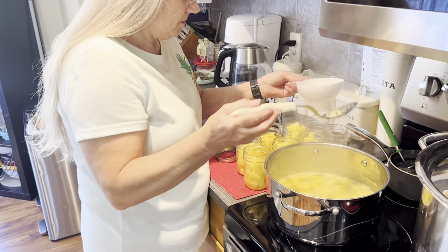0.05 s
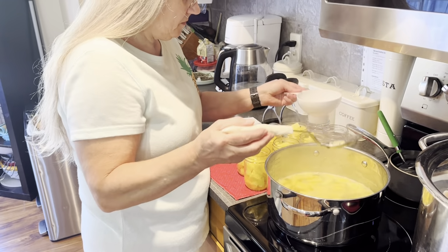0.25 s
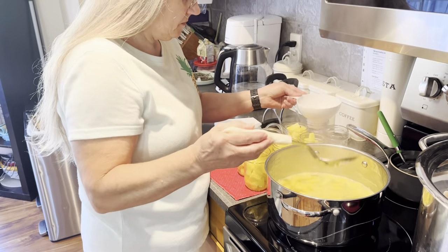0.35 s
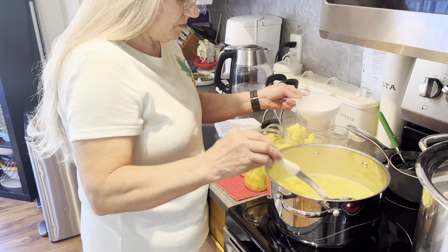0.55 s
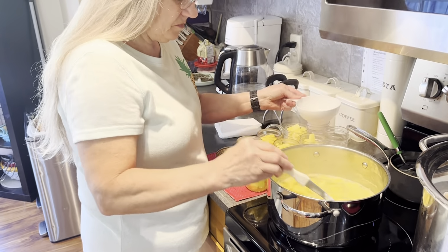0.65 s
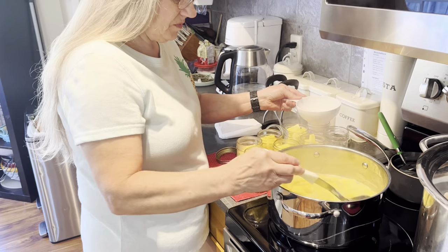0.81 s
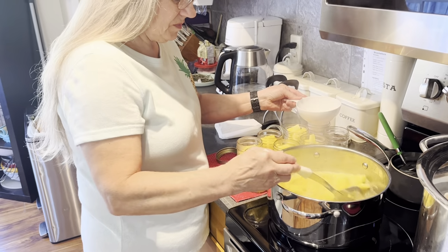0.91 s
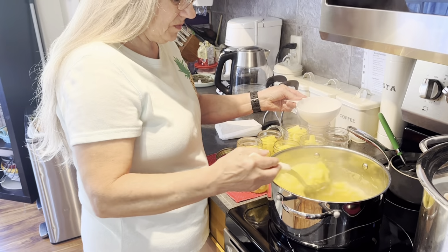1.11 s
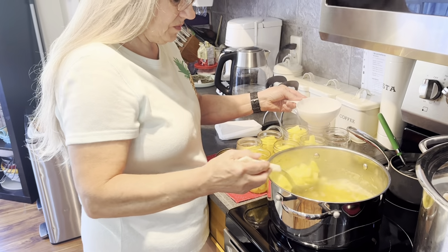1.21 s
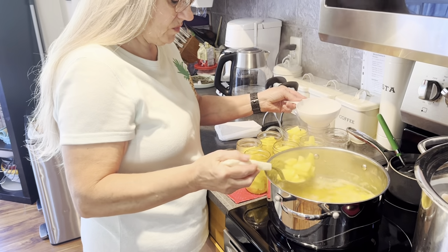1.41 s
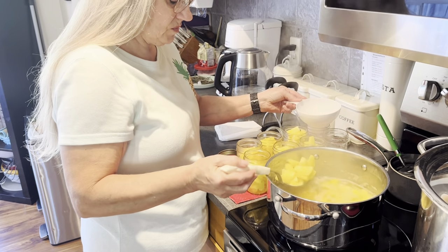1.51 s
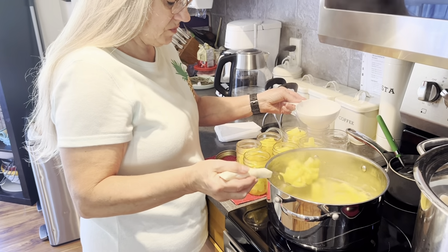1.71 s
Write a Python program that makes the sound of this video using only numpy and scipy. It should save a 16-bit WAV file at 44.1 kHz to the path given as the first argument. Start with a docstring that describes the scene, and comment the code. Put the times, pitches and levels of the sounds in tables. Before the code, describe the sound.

Spoon against a full cooking pot, with dull clinks and a gritty scrape, then a loud rim knock and a soft fruit thud; a funnel raps glass beforehand. Fridge hum, hard-walled kitchen, handheld phone in stereo.

```python
"""A home kitchen: a fridge hums behind, a low room rumble swells and dips, and hard walls give a short bright
tail. A plastic funnel knocks and rattles on a glass jar, a slotted metal spoon taps and scrapes along a full
steel pot and bumps its rim, fruit thuds softly and small wet ticks sound. Rough pushes ring banks of decaying
sines with a crack of noise and loose clatter; the scrape is dense clicks ringing the damped pot. All is heard
in stereo through the two microphone ports of a phone."""
import sys
import numpy as np
from scipy import signal
from scipy.fft import rfft, irfft
from scipy.io import wavfile
from scipy.ndimage import uniform_filter1d

SR = 44100
rng = np.random.default_rng(int(sys.argv[2]) if len(sys.argv) > 2 else 0)


def materialize(psi):
    """Save the field psi as 16-bit PCM at rate SR to the path in sys.argv[1].

    A 1-D psi becomes a single channel; in a 2-D psi each row is a channel.
    """
    bounded = np.clip(np.atleast_2d(psi).T, -1, 1)
    quanta = np.round(bounded * 32767).astype(np.int16)
    wavfile.write(sys.argv[1], SR, quanta)


N = 77175
T = np.arange(N) / SR  # s


def undb(db):
    """Decibels to gain."""
    return 10 ** (np.asarray(db) / 20)


def decay(t, t60):
    """Exponential fall of 60 dB in t60 seconds."""
    return 1000.0 ** (-t / t60)


def unit(x):
    """Scale to rms 1."""
    return x / np.sqrt(np.mean(x ** 2) + 1e-20)


def at(table, hz):
    """Read a table of frequency and value along a log frequency axis."""
    table = np.array(table)
    return np.interp(np.log(hz + 1), np.log(table[:, 0]), table[:, 1])


def colour(x, table):
    """Equalise by a table of frequency and dB, without phase shift."""
    gain = undb(at(table, np.fft.rfftfreq(N, 1 / SR)))
    return irfft(rfft(x) * gain, N)


def band(x, lo, hi):
    """Band-pass between two frequencies in Hz."""
    lo = max(lo, 10)
    sos = signal.butter(2, [lo, max(hi, lo + 1)], "band", fs=SR, output="sos")
    return signal.sosfilt(sos, x)


def curve(table, column):
    """Gain over time from a dB column."""
    table = np.array(table)
    return undb(np.interp(T, table[:, 0], table[:, column]))


def walk(rate):
    """Random levels held for 1 / rate seconds, then smoothed."""
    hold = int(SR / rate)
    steps = np.repeat(rng.standard_normal(N // hold + 1), hold)
    return uniform_filter1d(steps, hold)[:N]


# Spectrum of the air. Each row: frequency in Hz, relative density in dB per Hz.
AIR_COLOUR = [(80, -30), (140, -6), (270, -8), (560, -15), (1030, -21), (2530, -27), (7000, -32),
              (15000, -42)]


def air():
    """Quiet air of the room: coloured noise, weaker in the side."""
    noise = colour(rng.standard_normal((2, N)), AIR_COLOUR)
    level = band(noise[0], 150, 15000).std()
    return undb(-72) * noise / level * undb([[0], [-6]])


# Fridge hum over time. Each row: time in seconds, level in dB.
HUM_LEVEL = [(0.0, -70), (0.336, -59), (0.51, -66), (0.686, -54), (0.716, -65), (0.998, -65),
             (1.062, -47.5), (1.11, -63), (1.656, -60), (1.75, -64)]
# Low rumble over time. Each row: time in seconds, level in dB.
RUMBLE_LEVEL = [(0.0, -62), (0.092, -79), (0.19, -73), (0.276, -52), (0.554, -70), (0.642, -57),
                (0.672, -69), (0.706, -52), (0.93, -66), (0.96, -78), (1.042, -65), (1.222, -68),
                (1.276, -50), (1.524, -70), (1.568, -58), (1.75, -61)]


def narrow_noise(hz, width_hz):
    """Noise in a narrow band makes a wavering tone; the side is 14 dB down."""
    noise = rng.standard_normal((2, N))
    return unit(band(noise, hz - width_hz / 2, hz + width_hz / 2)) * undb([[0], [-14]])


def hum_and_rumble():
    """Wavering fridge hum and a low room rumble that swells and dips, nearly alike on both sides."""
    hum_hz = 120.4
    steady = np.sqrt(2) * np.sin(2 * np.pi * hum_hz * T) * undb([[0], [-16]])
    hum = steady + 0.4 * narrow_noise(hum_hz, width_hz=5)
    return curve(HUM_LEVEL, 1) * hum + curve(RUMBLE_LEVEL, 1) * narrow_noise(61, width_hz=36)


# Decay of the tail. Each row: frequency in Hz, time to fall 60 dB in seconds.
ROOM_T60 = [(100, 0.5), (400, 0.48), (1200, 0.45), (3000, 0.41), (7000, 0.35), (14000, 0.37)]
# Tail before its build-up. Each row: frequency in Hz, energy against the direct sound in dB.
ROOM_DB = [(100, -1), (400, -7), (1200, -9), (3000, -7), (7000, -6), (14000, -4)]
# Width of the tail. Each row: frequency in Hz, side against mid in dB.
ROOM_SIDE_DB = [(100, -8), (300, -11), (700, 3), (1500, 1), (3000, -3.5), (6000, 1.5), (14000, -10)]
# Echoes from the tiles and the hood. Each row: delay in seconds, level in dB.
ECHOES = [(.0045, -11), (.0095, -12)]


def room(x):
    """Hard walls: a noise tail that builds up fast and fades band by band, plus two early echoes."""
    t, tail = T[:SR], 0
    build_s = 0.0038
    for hz in 90 * 2 ** np.arange(0, 7.6, 0.5):
        noise = band(rng.standard_normal((2, SR)), hz / 1.19, hz * 1.19)
        t60 = at(ROOM_T60, hz)
        level = undb(at(ROOM_DB, hz) + np.array([[0], [at(ROOM_SIDE_DB, hz)]]))
        per_energy = np.sqrt(2 * np.log(1000) / t60 / SR)  # gives the decay unit energy
        tail = tail + level * per_energy * noise * decay(t, t60)
    tail = tail * (1 - np.exp(-(t / build_s) ** 2))
    for k, (delay_s, db) in enumerate(ECHOES):
        tail[:, int(delay_s * SR)] += undb(db) * np.array([1, 0.5 * (-1) ** k])  # alternate sides
    return signal.fftconvolve(x[None], tail, axes=1)[:, :N]


def ring(modes, lo, hi, damp=0.86):
    """Sum of decaying sines for the modes from lo to hi; neighbours swing in opposite sense."""
    t = T[:SR // 3]
    out = 0 * t
    for k, (hz, db, t60) in enumerate(modes):
        if lo <= hz < hi:
            out += (-1) ** k * undb(db) * np.sin(2 * np.pi * hz * t) * decay(t, damp * t60)
    return out


# Bands in which each hit is levelled. Each row: lower edge in Hz, upper edge in Hz.
BANDS_HZ = [(110, 300), (300, 650), (650, 1000), (1000, 1900), (1900, 2900), (2900, 7500), (7500, 15500)]
# Colour of the clatter. Each row: frequency in Hz, level against the blow in dB, before the kind of hit's own.
CLATTER = [(200, -4), (500, 1), (850, 3), (1400, -9), (2400, 1), (5000, -6), (11000, -7)]


def hits(events, modes, contact_ms, crack_db, crack_t60, clatter_db, clatter_t60):
    """A short rough push rings the modes and adds a crack of noise, band by band; loose things clatter on."""
    push_rough, first_touch = 0.4, 3.0
    clatter_per_s, clatter_build_s, clatter_side_db = 1300, 0.008, 1.5
    crack_tilt_db = 3.0  # per octave above 1 kHz
    t, head = T[:SR // 3], SR // 100  # the first 10 ms set the level
    out = np.zeros((2, N + SR))
    fade = (1 - np.exp(-t / clatter_build_s)) * decay(t, clatter_t60) * undb([[0], [clatter_side_db]])
    for start_s, *bands_db, pan_db in events:
        i = int(start_s * SR)
        push = np.exp(-t / (contact_ms / 1000)) * (1 + push_rough * rng.standard_normal(len(t)))
        push[0] += first_touch
        place = np.array([[1], [(undb(pan_db) - 1) / (undb(pan_db) + 1)]])  # mid and side
        grains = rng.random((2, len(t))) < clatter_per_s / SR
        grains = grains * rng.standard_normal((2, len(t)))
        for (lo, hi), db in zip(BANDS_HZ, bands_db):
            tone = band(signal.fftconvolve(push, ring(modes, lo, hi))[:len(t)], lo, hi)
            tone = tone / (tone[:head].std() + 1e-12)
            crack = band(rng.standard_normal(len(t)) * decay(t, crack_t60), lo, hi)
            crack_gain = undb(crack_db + crack_tilt_db * max(np.log2(hi / 1000), 0))
            blow = tone + crack_gain * crack / crack[:head].std()
            blow = blow / blow[:head].std() * place
            clatter_gain = undb(clatter_db + at(CLATTER, np.sqrt(lo * hi)))
            clatter = clatter_gain * unit(band(grains, lo, hi)) * fade
            out[:, i:i + len(t)] += undb(db) * (blow + clatter)
    return out[:, :N]


# Wet ticks. Each row: start in seconds, level in dB in each of the seven bands, left over right in dB.
TICKS = [(.158, -74, -79, -84, -84, -84, -82, -97, 1.1), (1.6876, -72, -76, -78, -75, -70, -65, -60, .6),
         (1.7057, -68, -68, -70, -63, -63, -58, -56, 1.9)]


def wet_ticks():
    """Small wet ticks: bursts of noise with no ringing body."""
    return hits(TICKS, [], contact_ms=3.0, crack_db=10, crack_t60=0.025, clatter_db=-20, clatter_t60=0.2)


# Fruit thuds. Each row: start in seconds, level in dB in each of the seven bands, left over right in dB.
THUDS = [(1.476, -39, -34, -48, -45, -55, -52, -67, -.6)]
# Modes of the fruit. Each row: frequency in Hz, level in dB, t60 in seconds before damping.
FRUIT = [(194, 0, .07), (366, 4, .13), (530, -6, .05), (684, 1, .05), (1085, 1, .1)]


def fruit_thuds():
    """A long soft contact rings a few low modes."""
    return hits(THUDS, FRUIT, contact_ms=6.0, crack_db=-13, crack_t60=0.04, clatter_db=-11, clatter_t60=0.38)


def stove_thump():
    """A falling tone as the hardest bump spreads through the stove top."""
    start_s, level_db, t60_s = 1.243, -40, 0.25
    from_hz, to_hz, fall_s = 400, 70, 0.012
    t = np.maximum(T - start_s, 0)
    turns = to_hz * t + (from_hz - to_hz) * fall_s * (1 - np.exp(-t / fall_s))
    return undb(level_db) * np.sin(2 * np.pi * turns) * decay(t, t60_s)


# Rim bumps. Each row: start in seconds, level in dB in each of the seven bands, left over right in dB.
BUMPS = [(1.038, -51, -58, -42, -45, -52, -48, -53, -1.1), (1.079, -62, -66, -54, -57, -55, -60, -73, -1.1),
         (1.111, -62, -64, -53, -62, -67, -67, -72, -3.5), (1.134, -65, -66, -52, -64, -69, -69, -72, -3.0),
         (1.24, -48, -35, -41, -25, -42, -37, -49, -2.5), (1.269, -52, -47, -56, -47, -60, -60, -72, .1),
         (1.364, -62, -49, -55, -55, -56, -54, -63, .1)]
# Modes of the rim. Each row: frequency in Hz, level in dB, t60 in seconds before damping.
RIM = [(125, 0, .12), (420, -14, .06), (565, 2, .055), (845, 0, .05), (1070, -5, .02), (1190, 1, .015),
       (1340, -6, .014), (1650, -7, .02), (2200, -6, .015), (2500, -3, .015), (2800, 0, .02),
       (3450, -5, .015), (4110, -4, .02), (4830, -3, .03), (6400, -3, .04)]


def rim_bumps():
    """The spoon bumps the pot's rim: a brief contact rings the rim modes."""
    return hits(BUMPS, RIM, contact_ms=1.1, crack_db=-10, crack_t60=0.02, clatter_db=-10, clatter_t60=0.3)


# Modes of the full pot. Each row: frequency in Hz, level in dB, t60 in seconds before damping.
POT = [(158, 0, .18), (425, 0.5, .09), (540, -2, .07), (750, 1, 0.09), (821, 1.5, .05), (1120, -3, .08),
       (1598, 1, .08), (1724, -2, .05), (2174, -2, .04), (2650, -2, .035), (3300, -5, .035),
       (3600, -4, .035), (3820, 5, .02), (4120, -6, .04), (4700, -6, .05), (5230, -6, .05), (6500, -7, .05)]
# Scrape over time. Each row: time in seconds, then level in dB of the middle, lower and treble band.
SCRAPE = [(.62, -58, -58, -60), (.66, -51, -58, -57), (.72, -51, -60, -61), (.8, -48, -66, -61),
          (.87, -48, -64, -57), (.94, -46, -66, -53), (1.0, -49, -63, -52), (1.05, -53, -60, -54),
          (1.09, -60, -58, -66), (1.14, -63, -60, -68), (1.23, -63, -65, -70)]


def pot_scrape():
    """Stick and slip: dense clicks ring the damped pot, with hiss; as the contact moves, other modes come up."""
    slips_per_s, slip_scatter_db, hiss_db, damp = 3000, 2.2, -0.5, 0.5
    shifts_per_s, patchy_db, tilt_db = 30, 5.5, 1.2  # tilt per octave
    slips = (rng.random(N) < slips_per_s / SR) * rng.choice([-1, 1], N)
    slips = slips * undb(slip_scatter_db * rng.exponential(size=N))
    out = 0
    for column, (lo, hi) in enumerate([(1400, 7500), (300, 1400), (7500, 15500)], start=1):
        tone = 0 * T
        for mode in POT:
            hz = mode[0]
            if lo <= hz < hi:
                drive = slips * undb(patchy_db * walk(shifts_per_s) + tilt_db * np.log2(hz))
                tone = tone + signal.fftconvolve(drive, ring([mode], lo, hi, damp))[:N]
        hiss = undb(hiss_db) * unit(band(slips, lo, hi))
        out = out + curve(SCRAPE, column) * unit(unit(tone) + hiss)
    fade_s = 0.025
    from_ends_s = np.minimum(T - SCRAPE[0][0], SCRAPE[-1][0] - T)
    return out * np.clip(from_ends_s / fade_s, 0, 1)


# Spoon taps. Each row: start in seconds, level in dB in each of the seven bands, left over right in dB.
TAPS = [(.573, -47, -53, -49, -47, -45, -40, -48, -.9), (.5765, -43, -52, -49, -52, -52, -44, -55, -.9),
        (.652, -47, -49, -51, -45, -49, -47, -52, -.8), (.672, -45, -46, -39, -42, -47, -45, -56, -1.7),
        (.703, -46, -52, -56, -54, -54, -54, -66, -1.0), (.763, -60, -66, -54, -44, -52, -45, -64, .1),
        (.819, -66, -64, -64, -52, -54, -52, -62, 1.1), (.888, -66, -56, -59, -51, -52, -51, -63, 1.5),
        (.969, -67, -66, -60, -55, -52, -52, -60, 1.3), (.991, -60, -54, -53, -54, -49, -51, -57, -.1),
        (1.356, -62, -56, -62, -48, -52, -53, -62, .6)]


def pot_taps():
    """The spoon taps the full pot and rings its modes."""
    return hits(TAPS, POT, contact_ms=3.0, crack_db=-8, crack_t60=0.03, clatter_db=-7, clatter_t60=0.28)


# Funnel knocks. Each row: start in seconds, level in dB in each of the seven bands, left over right in dB.
KNOCKS = [(.223, -50, -38, -35.5, -22, -37, -28.5, -44, -3.0),
          (.282, -47, -50, -47, -45, -53, -48, -56, 2.0), (.319, -54, -51, -45, -50, -55, -56, -67, -1.0)]
# Modes of the glass jar. Each row: frequency in Hz, level in dB, t60 in seconds before damping.
JAR = [(213, 0, 0.063), (361, 8.5, .13), (480, 0, .04), (600, -1, .03), (716, -2, .05), (850, -2, .04),
       (954, 0, .03), (1155.5, -3, .03), (1275, 1.5, .022), (1575, 3, .012), (1780, -6, .015),
       (2350, -8, .02), (2650, 0, .025), (2850, -4, .02), (3025, -3, .02), (3220, 1, .025), (3500, -5, .02),
       (3750, -5, .02), (4240, -8, .03), (4980, -8, .03), (6000, -8, .03)]


def jar_knocks():
    """The plastic funnel knocks on the glass: a brief contact rings the jar and a rattle follows."""
    return hits(KNOCKS, JAR, contact_ms=1.1, crack_db=-11, crack_t60=0.025, clatter_db=-6, clatter_t60=0.38)


# Direct sound fed to the side. Each row: frequency in Hz, level against mid in dB.
DIRECT_SIDE_DB = [(150, -22), (500, -11.5), (1200, -6), (3000, -22.5), (6000, 2), (9000, -5.5)]
# Treble cancelling in the sum of the two ports. Each row: frequency in Hz, gain in dB.
MID_PORT = [(6500, -3), (7600, -10), (8000, -27.5), (8900, -17.5), (9600, -9), (10500, -4.5), (13800, -8.5),
            (14800, -26)]
# Treble cancelling in the difference of the two ports. Each row: frequency in Hz, gain in dB.
SIDE_PORT = [(7000, -4), (10300, 4), (11200, -14), (13000, -16), (13800, -4), (16000, 2)]


def scene():
    """Sum the sources as mid and side, then turn them into left and right through the ports."""
    port_lag_s = 0.0002
    mid, side = wet_ticks() + fruit_thuds() + rim_bumps() + pot_taps() + jar_knocks()
    mid = mid + pot_scrape() + stove_thump()
    side = side + colour(np.interp(T - port_lag_s, T, mid), DIRECT_SIDE_DB)
    mid, side = np.array([mid, side]) + room(mid) + hum_and_rumble() + air()
    mid, side = colour(mid, MID_PORT), colour(side, SIDE_PORT)
    return np.array([mid + side, mid - side])


def record(dry):
    """The phone cuts the top with a steep low-pass."""
    top_hz = 16200
    return signal.sosfilt(signal.ellip(8, 0.2, 70, top_hz, fs=SR, output="sos"), dry)


dry = scene()
out = record(dry)
materialize(out)
```